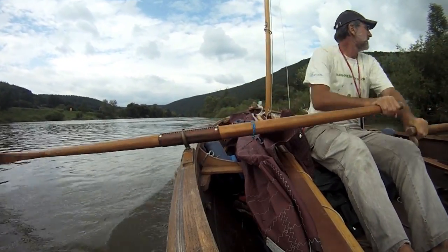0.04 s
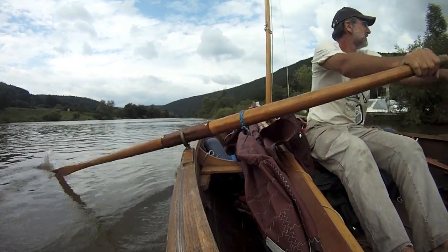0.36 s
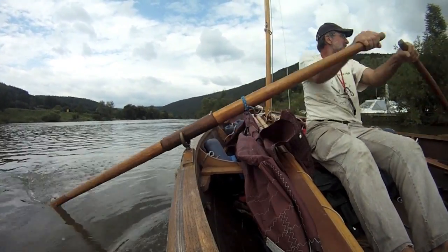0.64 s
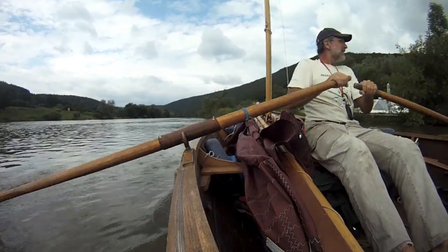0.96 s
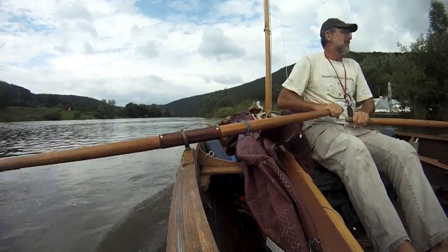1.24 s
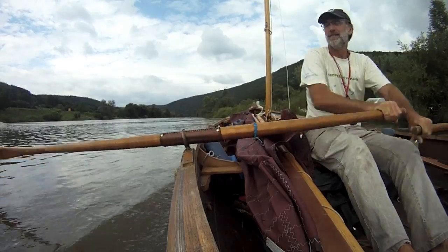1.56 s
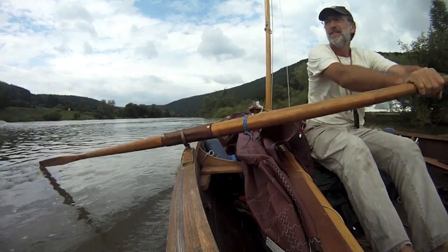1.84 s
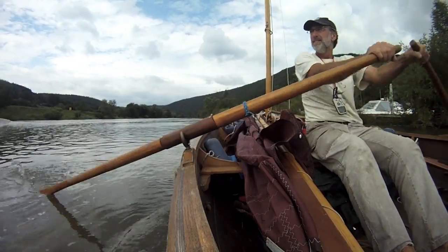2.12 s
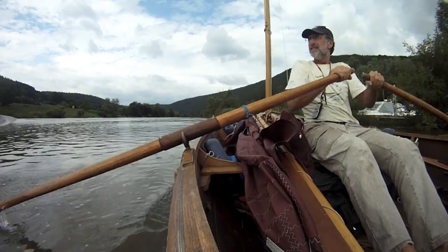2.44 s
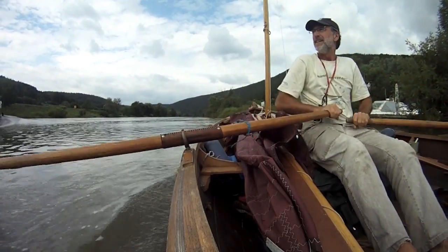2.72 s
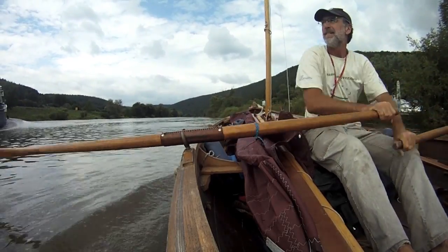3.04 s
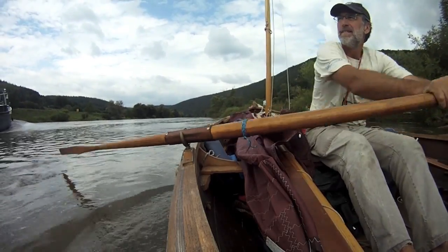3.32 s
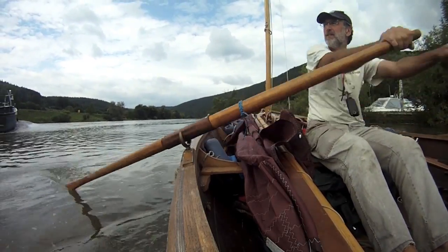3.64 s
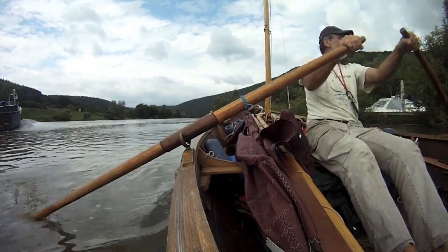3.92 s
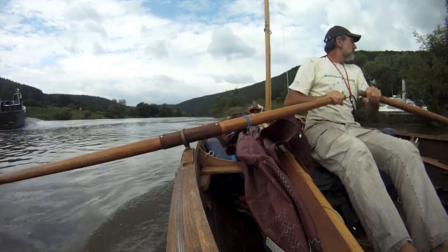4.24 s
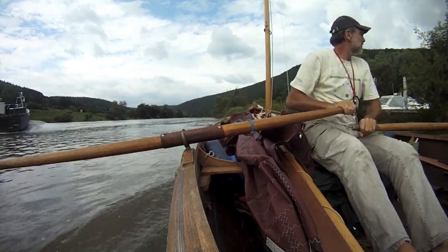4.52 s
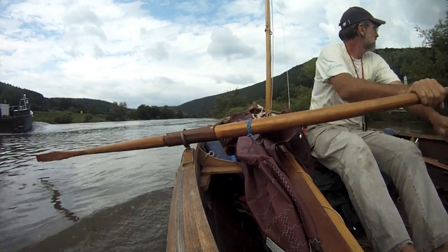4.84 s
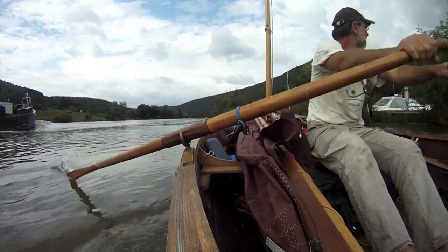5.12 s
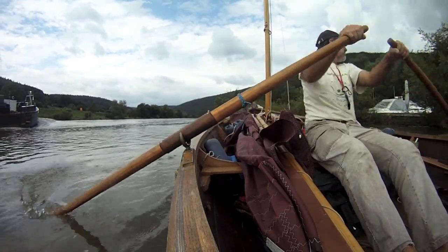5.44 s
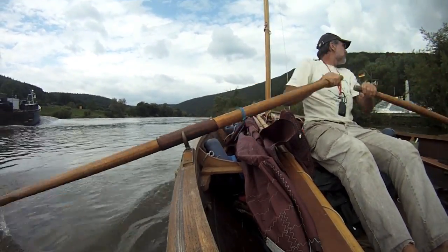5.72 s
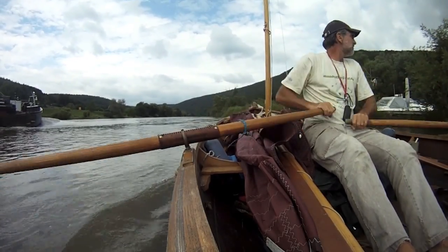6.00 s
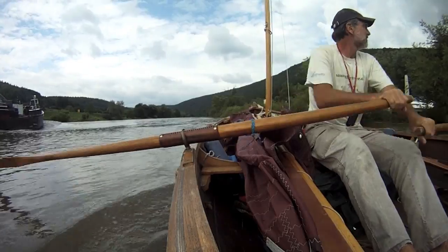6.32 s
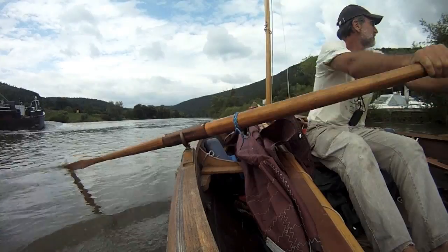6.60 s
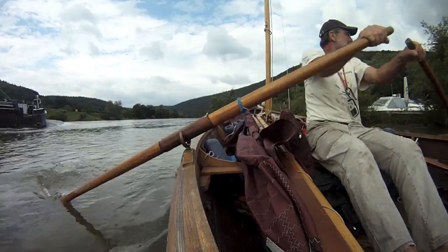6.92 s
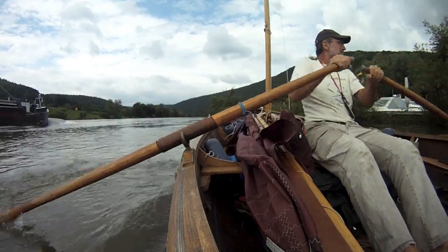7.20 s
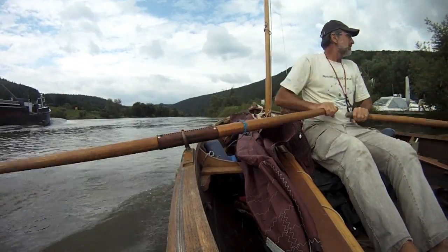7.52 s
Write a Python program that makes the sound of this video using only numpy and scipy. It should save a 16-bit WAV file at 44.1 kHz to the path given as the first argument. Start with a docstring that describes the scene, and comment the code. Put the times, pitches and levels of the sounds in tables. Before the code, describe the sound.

A small wooden boat is rowed along a river, five strokes about a second and a half apart. The oars clack in their oarlocks as the blades go in and knock hardest as they come out, each time with a hollow boom from the hull. Water laps, splashes and bubbles between the knocks over a low wind rumble. The sound is close and boxy, from a microphone enclosed on the boat's edge.

```python
"""Water laps and oars knock as a small wooden boat is rowed along a river, five strokes in all.
The oars hit their oarlocks at the catch (blades go in) and, hardest, at the finish (blades come out).
The hull booms under them. Bubbles ring along the planks and splash off the blades, over a low wind.
It is all heard by a camera shut in a waterproof case on the gunwale, the boat's top edge.
The camera takes 12000 samples a second and turns itself down on the hardest knocks."""
import sys
import numpy as np
from scipy import signal
from scipy.fft import rfft, irfft
from scipy.io import wavfile
from scipy.ndimage import uniform_filter1d

SR = 44100
rng = np.random.default_rng(int(sys.argv[2]) if len(sys.argv) > 2 else 0)


def inscribe(sig):
    """Save sig as 16-bit PCM at rate SR to the path in sys.argv[1].

    A 1-D sig is mono; a 2-D sig holds one channel per row.
    Samples are clipped to [-1, 1] before scaling.
    """
    pcm = np.round(np.clip(np.atleast_2d(sig).T, -1, 1) * 32767)
    wavfile.write(sys.argv[1], SR, pcm.astype(np.int16))


N = 333396
TIME = np.arange(N) / SR

# The timing of the strokes. Each row: forward swing, full reach, catch and finish, all in seconds.
STROKE_TIMES = [(0.08, 0.152, 0.427, 1.153), (1.48, 1.685, 2.035, 2.697), (3.02, 3.215, 3.571, 4.338),
                (4.66, 4.822, 5.116, 5.883), (6.26, 6.345, 6.686, 7.482)]
# The strength of the strokes. Each row, in relative dB: boom at the reach, at the catch, at the finish,
# deep note of the finish, settling boom compared with the finish, jolt, push on the hull, stirred water.
STROKE_LEVELS = [(-26, -32, -31, -33, -15, -46, -67, -12), (-41, -33.5, -52, -29, -3, -41, -54, 0),
                 (-30, -34, -28, -34.5, -4.5, -49, -51, -1), (-33.5, -38, -29.5, -31, -10.5, -52, -51, 3.5),
                 (-40, -48, -25.5, -41, -26, -58, -55, -2)]
# The loudest slaps of water on blades and planks. Each row: start in seconds, level in dB,
# middle pitch in Hz, fade time in seconds, relative level of the hull's boom in dB.
WATER_SLAPS = [(0.413, -46.5, 750, 0.025, -45), (1.063, -46.5, 890, 0.07, -43.5),
               (1.235, -49, 870, 0.0032, -40.5), (1.511, -46.5, 900, 0.008, -44),
               (1.97, -43, 870, 0.045, -36.5), (2.209, -45, 1940, 0.0082, -42.5),
               (2.567, -46.5, 1160, 0.033, -38.5), (3.619, -45, 850, 0.01, -42),
               (3.685, -41, 890, 0.0031, -43), (3.743, -42, 2150, 0.038, -58),
               (3.855, -49.5, 1820, 0.021, -40.5), (4.091, -47.5, 565, 0.015, -57),
               (4.695, -48.5, 820, 0.01, -39.5), (4.857, -45.5, 1110, 0.0088, -46),
               (5.113, -42, 780, 0.012, -45), (5.331, -45, 2090, 0.016, -54), (5.455, -44, 710, 0.035, -42),
               (6.26, -49, 1100, 0.0091, -47.5), (6.324, -46, 1090, 0.041, -60),
               (6.925, -46.5, 900, 0.029, -51), (6.965, -45, 1410, 0.0096, -50),
               (7.074, -45.5, 1010, 0.0066, -45), (7.166, -47, 1320, 0.026, -47),
               (7.269, -48.5, 1200, 0.0097, -53)]


def amp(db):
    """Turns decibels into a number to multiply by."""
    return 10 ** (np.asarray(db) / 20)


def unit(x):
    """Scales a sound to an average (rms) level of 1."""
    return x / np.sqrt(np.mean(x ** 2) + 1e-20)


def crest(x):
    """Scales a sound so that its loudest 3 ms have a level of 1."""
    return x / np.sqrt(uniform_filter1d(x ** 2, size=132).max() + 1e-20)


def add(mix, start_s, sound):
    """Mixes a sound in at the given time."""
    part = mix[max(round(start_s * SR), 0):][:len(sound)]
    part += sound[:len(part)]


def noise(points):
    """Noise whose tone follows a list of (Hz, dB) points."""
    hz, db = np.transpose(points)
    gain = amp(np.interp(np.log(np.fft.rfftfreq(N, 1 / SR) + 1), np.log(hz), db, right=-120))
    return unit(irfft(rfft(rng.standard_normal(N)) * gain, N))


def drift(rate_hz):
    """A smooth random wobble, up to about the given rate."""
    gain = np.exp(-(np.fft.rfftfreq(N, 1 / SR) / rate_hz) ** 2)
    return unit(irfft(rfft(rng.standard_normal(N)) * gain, N))


def swell(start_s, rise_s, hold_s, fade_s):
    """A loudness curve that rises, holds and dies away."""
    t = TIME - start_s
    return np.clip(t / rise_s, 0, 1) * np.exp(-np.maximum(t - rise_s - hold_s, 0) / fade_s)


def ring(hz, t60, rise_s, glide):
    """A tone that fades 60 dB in t60 seconds (its ring time) while its pitch moves by the share glide."""
    t = np.arange(0, t60 + 4 * rise_s, 1 / SR)
    turns = hz * (t + .5 * glide * t ** 2 / t60)
    soft_start = 1 - np.exp(-(t / rise_s) ** 2)
    return np.sin(2 * np.pi * turns) * soft_start * np.exp(-np.log(1000) * t / t60)


def through_case(x):
    """The planks and the air in the case ring along with the water and colour its sound."""
    # The ringing bands. Each row: pitch in Hz, width in Hz, level in dB.
    resonances = [(527, 74, -8.5), (710.4, 92, 3), (812, 230, -2.5), (1073, 322, -1), (1505, 366, -5.5),
                  (1840, 550, -11.5), (2139, 455, -3), (2720, 660, -20), (3724, 690, -26),
                  (4750, 3100, -34)]
    f = abs(np.fft.fftfreq(4096, 1 / SR))
    power = sum(amp(db) ** 2 / (1 + (2 * (f - hz) / width) ** 2) ** 3 for hz, width, db in resonances)
    log_gain = .5 * np.log(power + 1e-9)
    spectrum = np.exp(np.conj(signal.hilbert(log_gain)))  # rings after a sound, never before it
    response = np.fft.ifft(spectrum).real
    return signal.oaconvolve(x, response[:len(f) // 2])[:N]


def gunwale(x, echo_db=-15.0, t60=0.05):
    """Planks, seats and the case scatter a sound into a short rough tail."""
    t = np.arange(len(x)) / SR
    soft_start = 1 - np.exp(-(t / 0.00058) ** 2)
    echoes = rng.standard_normal(len(t)) * soft_start * np.exp(-np.log(1000) * t / t60)
    return x + amp(echo_db) * signal.fftconvolve(x, echoes / np.linalg.norm(echoes))[:len(x)]


def stirring(rise_s=0.024, steady_lap=0.57):
    """How hard the water laps, splashes and pushes on the hull: each stroke adds to the quiet glide."""
    lapping, splashing, push = (np.full(N, amp(db)) for db in (-64.5, -64.5, -62.5))
    for (swing_s, _, catch_s, finish_s), (*_, push_db, stir_db) in zip(STROKE_TIMES, STROKE_LEVELS):
        entry_s = catch_s - 0.064  # the blades touch the water just before the catch
        swing = swell(swing_s, rise_s, hold_s=0.21, fade_s=0.099)
        dip = amp(-60.5) * swell(entry_s, rise_s=0.06, hold_s=0, fade_s=0.047)
        pull = swell(entry_s, rise_s, hold_s=finish_s - entry_s, fade_s=0.1)
        churn = amp(stir_db) * swell(entry_s, rise_s=0.37, hold_s=0, fade_s=0.36)
        shove = amp(push_db) * pull * swell(entry_s, rise_s, hold_s=0, fade_s=0.58)
        lapping = np.hypot(lapping, amp(-60.5) * swing + amp(-57.5) * np.hypot(steady_lap * pull, churn))
        splashing = np.hypot(splashing, amp(-71) * swing + amp(-63.5) * churn + dip)
        push = np.hypot(push, amp(-56.5) * swing + shove)
    return lapping, splashing, push


def rumble(push, level_db=-55, gust_db=2.0):
    """Wind and the rocking of the boat shake the case, more when the water pushes on the hull."""
    # The tone of the rumble. Each row: pitch in Hz, relative level in dB.
    rumble_tone = [(8, -13), (18, -2.5), (28, 0), (42, -10), (65, -14.5), (100, -25), (200, -29.5),
                   (600, -38)]
    shaking = noise(rumble_tone) * push ** 0.38 * amp(gust_db * drift(rate_hz=7.9))
    return unit(shaking) * amp(level_db)


def bubbles(low_hz, high_hz, per_s, cycles, spread_db, sizes=22):
    """A swarm of bubbles: each rings briefly and rises in pitch; a few are far louder than the rest."""
    out = np.zeros(N)
    for hz in np.geomspace(low_hz, high_hz, sizes):
        when, luck = rng.random((int(per_s * N / SR / sizes), 2)).T
        pops = np.zeros(N)
        pops[(when * N).astype(int)] = amp(spread_db * np.minimum(-np.log(1 - luck), np.pi))
        bubble = ring(hz, t60=cycles / hz, rise_s=1 / hz, glide=0.14)
        out += signal.oaconvolve(pops, bubble)[:N] * hz / low_hz
    return unit(out)


def water(lapping, splashing):
    """Large slow bubbles lap along the planks; small quick ones and spray come off the blades."""
    wash = noise([(300, -11.5), (500, -15), (1200, -11), (1700, -17.5), (3000, -52)])
    spray = noise([(700, -40.0), (1400, -7.5), (2200, -1.5), (3500, 7.0), (6000, 4)])
    lap = bubbles(low_hz=532.4, high_hz=1330, per_s=200, cycles=54, spread_db=3.8) + amp(-1.5) * wash
    splash = bubbles(low_hz=1346, high_hz=3020, per_s=550, cycles=42, spread_db=4.5) + amp(6.5) * spray
    slosh_db = 2.7 * drift(rate_hz=27)  # wavelets break in clumps
    return (unit(through_case(lap)) * lapping * amp(slosh_db - 2)
            + unit(through_case(splash)) * splashing * amp(slosh_db))


def plops(rise_s=0.00494):
    """Single large bubbles ring close to the boat, each rising a little in pitch."""
    # Each row: time in seconds, relative level in dB, pitch in Hz, ring time in seconds.
    big_bubbles = [(0.807, -42.5, 829, 0.06), (0.854, -48, 774, 0.062), (0.975, -47.5, 1430, 0.096),
                   (1.306, -46.5, 967, 0.095), (1.346, -40, 760, 0.034), (1.403, -41.5, 1084, 0.065),
                   (2.355, -38, 724, 0.029), (4.265, -46, 690, 0.056), (7.334, -44.5, 1440, 0.029),
                   (7.359, -44, 1120, 0.053)]
    out = np.zeros(N)
    for time_s, level_db, hz, t60 in big_bubbles:
        plop = gunwale(ring(hz, t60, rise_s, glide=0.082))
        add(out, time_s - rise_s / 2, amp(level_db - 5) * crest(plop))
    return out


def slap(hz, fade_s, width_octaves=0.74, rise_s=0.00072):
    """A slap of water traps a crowd of bubbles of similar size, which all ring at once."""
    t = np.arange(SR // 6) / SR
    f = np.fft.rfftfreq(len(t), 1 / SR) + 1
    band = np.exp(-.5 * (np.log2(f / hz) / width_octaves) ** 2)
    crowd = irfft(rfft(rng.standard_normal(len(t))) * band, len(t))
    return crest(through_case(crowd * (1 - np.exp(-t / rise_s)) * np.exp(-t / fade_s)))


def slaps(lapping, low_hz=600, high_hz=2300, wavelets=50):
    """Small waves break at random, louder when the lapping is strong; the big slaps come on top."""
    out = np.zeros(N)
    for k, (when, size, pitch) in enumerate(rng.random((wavelets, 3))):
        at = int((k + when) * N / wavelets)
        strength = lapping[at] * amp(1.5 + 4 * size)
        add(out, at / SR, strength * slap(low_hz * (high_hz / low_hz) ** pitch, fade_s=0.012))
    for start_s, level_db, hz, fade_s, _ in WATER_SLAPS:
        add(out, start_s, amp(level_db) * slap(hz, fade_s))
    return out


def jolts():
    """Each finish shakes the whole boat with a dull shudder."""
    # The tone of the shudder. Each row: pitch in Hz, relative level in dB.
    jolt_tone = [(35, -8), (60, -2), (100, -8.5), (170, -4), (260, -13.5), (400, -33)]
    shake = np.zeros(N)
    for (*_, finish_s), (*_, jolt_db, _, _) in zip(STROKE_TIMES, STROKE_LEVELS):
        shake += amp(jolt_db) * swell(finish_s, rise_s=0.028, hold_s=0, fade_s=0.073)
    return noise(jolt_tone) * shake


def thumps(boom_hz=238.4, deep_hz=181.2, settle_s=0.075):
    """Slaps and strokes thump the hull. Each row: seconds, relative dB, Hz, ring time in seconds."""
    rows = [(time_s, boom_db, boom_hz, 0.22) for time_s, *_, boom_db in WATER_SLAPS]
    for (_, reach_s, catch_s, finish_s), levels in zip(STROKE_TIMES, STROKE_LEVELS):
        reach_db, catch_db, finish_db, deep_db, settle_db, *_ = levels
        rows += [(reach_s, reach_db, boom_hz, 0.17), (catch_s, catch_db, boom_hz, 0.23)]
        for level_db, hz in (finish_db, boom_hz), (deep_db, deep_hz):
            rows.append((finish_s, level_db, hz, 0.23))
            rows.append((finish_s + settle_s, level_db + settle_db, hz, 0.2))  # the oars drop back
    return rows


def hull(push, rise_s=0.00796, shudder_s=0.012, detune=0.0088):
    """A thump makes the hull boom on two notes and its planks shudder; the water keeps it murmuring."""
    # The tone of the murmur and shudder. Each row: pitch in Hz, relative level in dB.
    hull_tone = [(60, -19), (105, -15.5), (150, -11), (185, -7.5), (215, -0.5), (238, 3.5), (268, -6),
                 (310, -17), (400, -28.5), (600, -25), (1200, -75)]
    out, shudder = np.zeros(N), np.zeros(N)
    t = np.arange(SR // 4) / SR
    for time_s, level_db, hz, t60 in thumps():
        start_s = time_s - rise_s / 2
        hz *= 1 + detune * rng.standard_normal()
        boom = ring(hz, t60, rise_s, glide=-0.008)
        undertone = ring(hz * 0.704, t60 * 0.92, rise_s, glide=-0.032)
        add(out, start_s, amp(level_db - 3) * crest(boom))
        add(out, start_s, amp(level_db - 21) * crest(undertone))
        add(shudder, start_s, amp(level_db - 9) * t / shudder_s * np.exp(1 - t / shudder_s))
    murmur = push * amp(2.5 + 3.5 * drift(rate_hz=12.3))
    return out + noise(hull_tone) * np.hypot(murmur, shudder)


def blows(hard_db=-26.5, graze_s=0.00304, rebound_s=0.0065):
    """Lists the blows of oar on oarlock; a hard one grazes the lock first and bounces once after."""
    # Each row: start in seconds, clack level in dB, hollow wood compared with the clack in dB,
    # treble boost in dB, ring time multiplier, chatter compared with the blow in dB.
    knocks = [(0.1769, -34.5, -5, 8, 1.1, -3), (0.245, -33.5, -13, -3, 0.43, -14),
              (0.3745, -50, 1.5, -6, 0.75, -3), (0.4814, -35, -21.5, 4, 0.53, -6),
              (1.148, -23, -4, 6, 0.8, -0.5), (1.6018, -42.5, -0.5, -3, 0.91, -7.5),
              (2.024, -26.5, -13, 7.5, 0.39, -1.5), (2.693, -32, 0, 4.5, 0.99, 7),
              (3.0809, -39.5, -15, -10, 0.45, -1), (3.3308, -47, -8, -15, 0.64, -23),
              (4.3169, -15.5, -3.5, 3.5, 0.49, -4), (4.6593, -44.5, -11, -9, 0.49, -5),
              (4.8828, -46.5, -6, -5, 1.2, -2), (5.1814, -35.5, -18, 2, 0.83, -4),
              (5.875, -14.5, -7, 2, 0.61, -5.5), (5.8825, -24, -41, 4, 0.27, -29),
              (6.6877, -38.5, -6, -19, 0.67, -3), (6.7888, -46, -16, -22, 0.64, -13),
              (7.4802, -22, -4.5, 8, 0.57, 2)]
    rows = list(knocks)
    for start_s, level_db, *tone in knocks:
        if level_db > hard_db:
            rows.append((start_s - graze_s, level_db - 18, *tone))
            rows.append((start_s + rebound_s, level_db - 13.5, *tone))
    return rows


def oarlocks(chatter_s=0.0031, scatter_db=4.0, detune=0.0052, wood_lag_s=0.00162):
    """Each blow and its brief chatter make oar and lock ring; no two blows land on the same spot."""
    # The notes of oar, lock and gunwale. Each row: pitch in Hz, relative level in dB,
    # base ring time in seconds.
    lock_notes = [(530, -21, .05), (695, -3, .06), (760, -7, .035), (860, -8, .03), (1010, -3, .035),
                  (1090, -3, .035), (1220, -8, .028), (1490, -5, .045), (1610, -7, .025), (1790, -7, .025),
                  (1960, -1, .028), (2160, 0, .036), (2290, -9, .028), (2560, -20, .025), (2730, -24, .022),
                  (3000, -32, .022), (3740, -22, .024), (3950, -27, .018), (4900, -33, .008)]
    hz, db, t60 = np.transpose(lock_notes)[:, :, None]
    signs = (-1.) ** np.arange(len(hz))[:, None]  # neighbours start opposed, so the ring builds up
    hollow, bright = hz[:, 0] < 1400, hz > 2450
    out = np.zeros(N)
    t = np.arange(SR // 6) / SR
    for start_s, level_db, hollow_db, treble_db, ring_scale, chatter_db in blows():
        spot, tuning = rng.standard_normal((2, len(hz), 1))
        strengths = signs * amp(db + scatter_db * spot + treble_db * bright)
        notes = strengths * np.sin(2 * np.pi * hz * (1 + detune * tuning) * t)
        notes *= np.exp(-np.log(1000) * t / (t60 * ring_scale))
        chatter = rng.standard_normal(len(t)) * t * np.exp(-2 * t / chatter_s)
        force = gunwale((t == 0) + amp(chatter_db) * chatter / np.linalg.norm(chatter))
        clack = crest(signal.fftconvolve(force, notes[~hollow].sum(0))[:len(t)])
        wood = crest(signal.fftconvolve(force, notes[hollow].sum(0))[:len(t)])
        wood = gunwale(wood, echo_db=-4.5, t60=0.087)  # the loose oar rattles on for a moment
        add(out, start_s, amp(level_db) * clack)
        add(out, start_s + wood_lag_s, amp(level_db + hollow_db) * wood)
    return out


def scene():
    """Boat, water and wind reach one microphone, the same on both channels."""
    lapping, splashing, push = stirring()
    boat = oarlocks() + hull(push) + jolts()
    mix = boat + water(lapping, splashing) + slaps(lapping) + plops() + rumble(push)
    return np.array([mix, mix])


def record(dry, ceiling_db=-15.5, threshold_db=-26.5, squeeze=0.37, attack_s=0.006, hold_hz=12000):
    """The hardest knocks turn the camera down and overload it; its held samples add a thin treble."""
    power_db = 10 * np.log10(abs(uniform_filter1d(dry[0] ** 2, size=200)) + 1e-12)
    fall_db = 53 * TIME
    peak_db = np.maximum.accumulate(power_db + fall_db) - fall_db  # each peak is slowly forgotten
    over_db = np.maximum(peak_db - threshold_db, 0)
    lag = np.exp(-1 / (attack_s * SR))
    turned_down = dry[0] / amp(squeeze * signal.lfilter([1 - lag], [1, -lag], over_db))
    samples = np.clip(signal.resample_poly(turned_down, hold_hz, SR), -amp(ceiling_db), amp(ceiling_db))
    # Holding each sample mirrors the sound around hold_hz.
    held = signal.resample_poly(np.repeat(samples, 4), SR, 4 * hold_hz)[:N]
    low_pass = signal.firwin(255, cutoff=15600, window=("kaiser", 8), fs=SR)
    return np.tile(signal.oaconvolve(held, low_pass, "same"), (2, 1))


dry = scene()
out = record(dry)
inscribe(out)
```